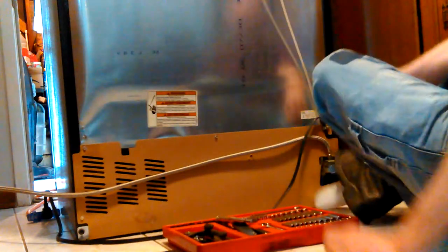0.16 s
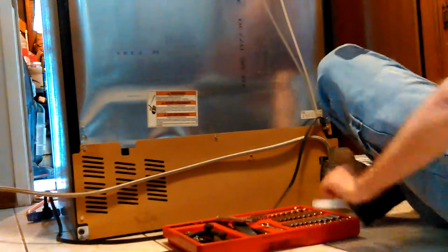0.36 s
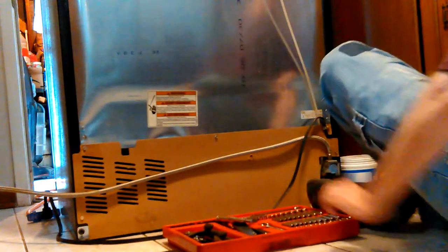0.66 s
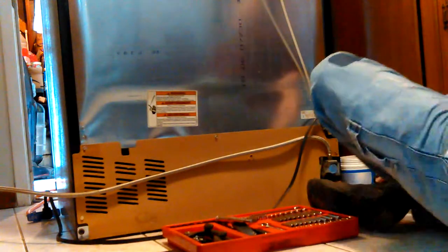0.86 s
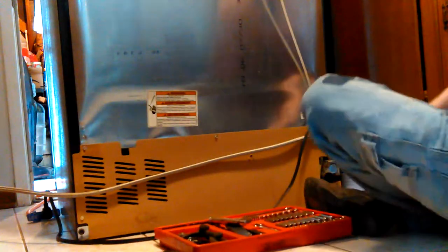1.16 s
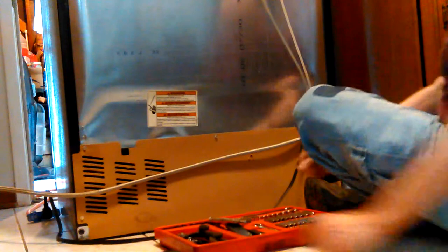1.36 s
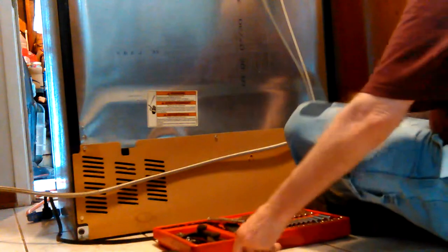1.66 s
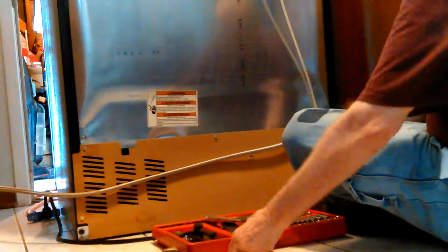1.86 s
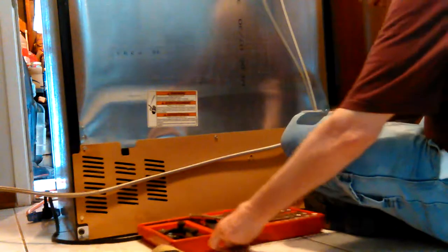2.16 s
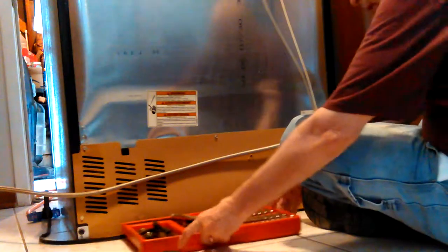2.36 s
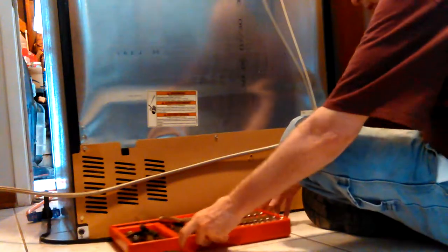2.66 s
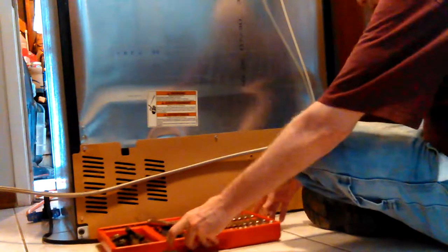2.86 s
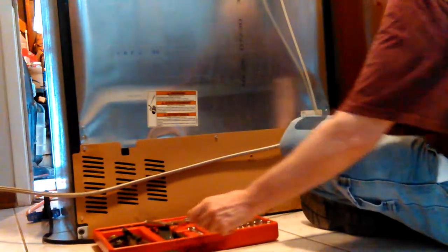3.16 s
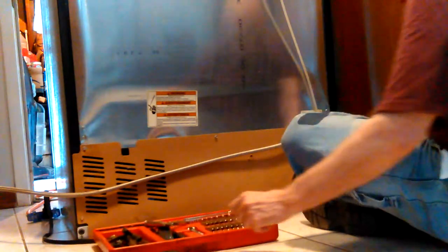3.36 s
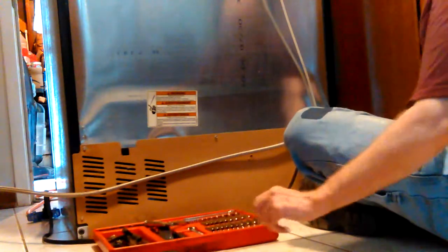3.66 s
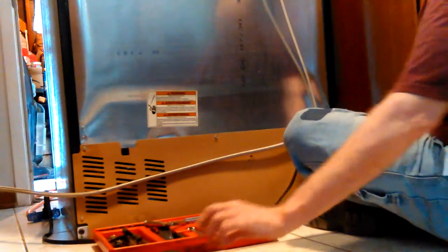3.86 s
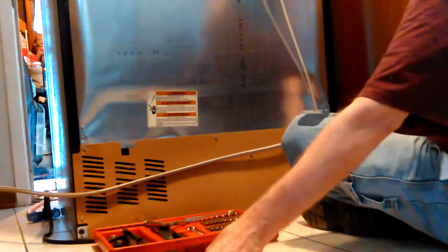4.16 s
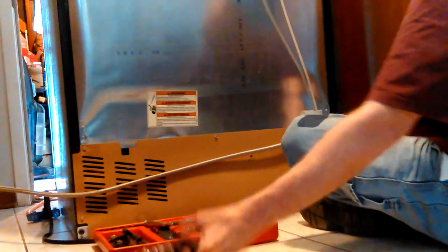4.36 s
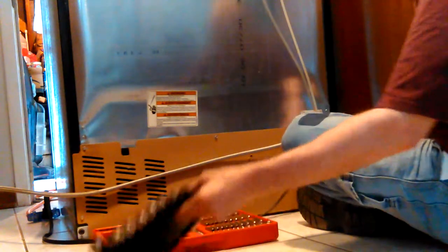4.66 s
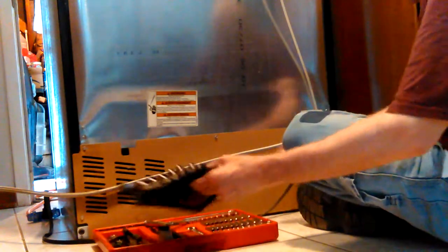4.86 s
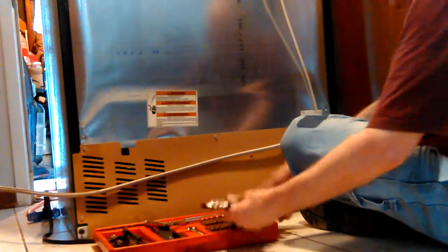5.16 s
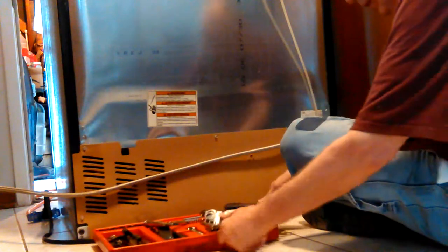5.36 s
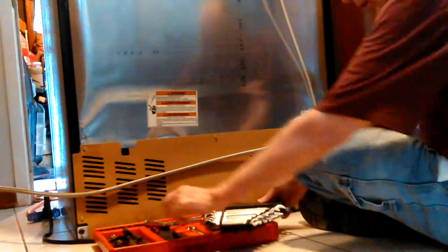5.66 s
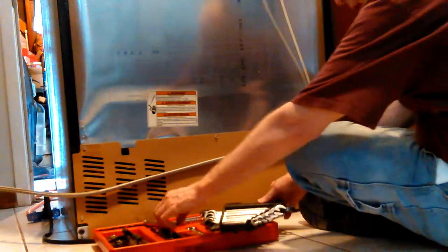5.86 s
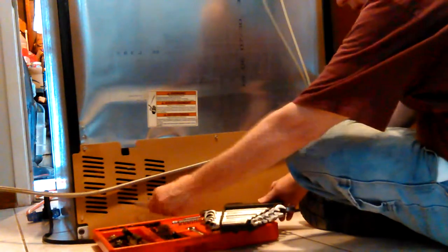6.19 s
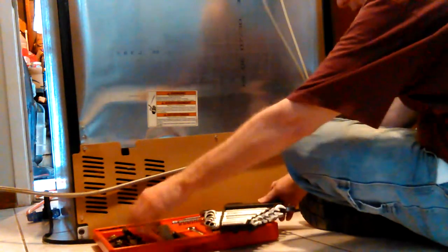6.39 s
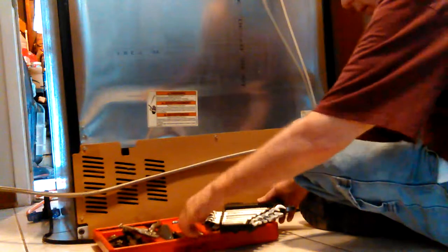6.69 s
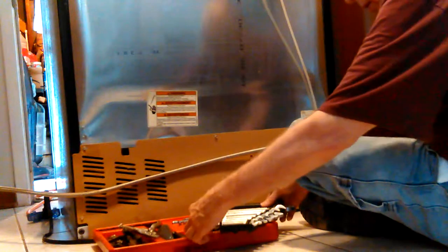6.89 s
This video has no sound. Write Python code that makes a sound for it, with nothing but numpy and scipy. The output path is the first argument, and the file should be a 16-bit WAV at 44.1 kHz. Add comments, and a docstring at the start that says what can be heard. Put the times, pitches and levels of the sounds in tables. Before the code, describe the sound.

Hollow bumps and rocking plastic taps, a plastic case scraping across tile, padded knocks, faint metal clinks, then a tool dropping and bouncing in a tray.

```python
"""A brush of cloth and hollow bumps over a low steady rumble: someone kneels on a tiled kitchen floor.
A small hard object rocks and taps, a plastic socket case is dragged closer, a pouch of wrenches is laid
on it, fingers pick among the sockets, and a tool drops back into the tray and bounces.
Blows are impulse responses of damped modes; sliding and brushing are random slips through a body.
The hard room answers them with dense echoes; shaped noise makes the rumble and a faint hiss."""
import sys
import numpy as np
from scipy import signal
from scipy.fft import rfft, irfft, next_fast_len
from scipy.io import wavfile
from scipy.ndimage import uniform_filter1d, map_coordinates

SR = 44100
rng = np.random.default_rng(int(sys.argv[2]) if len(sys.argv) > 2 else 0)


def output_pcm(signal):
    """Save a mono or channel-first signal as 16-bit PCM at the path in sys.argv[1].

    Samples are clipped to [-1, 1] before scaling.
    """
    pcm = np.clip(np.atleast_2d(signal).T, -1, 1) * 32767
    wavfile.write(sys.argv[1], SR, np.round(pcm).astype(np.int16))


N = 310023
HZ = np.fft.rfftfreq(16384, 1 / SR)  # frequency grid of the bodies
T = np.arange(SR * 3 // 4) / SR  # time within one blow [s]

# Levels of blows are those before the balance of the registers is applied.
# Hollow bumps as the body shifts: (time [s], level [dB], hardness [dB])
BUMPS = [(0.099, -31, -5), (0.126, -33.5, 7), (0.32, -39.5, -8)]
# Blows of a light plastic object: (time [s], level [dB], hardness [dB], time for light touches before [s])
ROCKS = [(0.273, -33, 3, 0.010), (0.412, -38, 0.5, 0.022), (0.529, -39.5, -1, 0.017),
         (0.607, -42.5, -3, 0.0018), (0.645, -53.5, 4, 0.00047), (3.45, -58, -24, 0.0046),
         (3.705, -63.5, -2.5, 0.000027)]
# Dull knocks of hand and padded wrenches: (time [s], level [dB], weight [dB])
KNOCKS = [(0.668, -40.5, 8.5), (0.943, -40, -1.5), (3.556, -51, 9), (3.705, -53, 5.5), (4.466, -40.5, 7.5),
          (4.598, -35.5, 3), (5.236, -25, -1), (5.32, -29.5, -9), (5.365, -23.5, -15), (5.435, -31, 4.5),
          (5.484, -34.5, 11), (5.502, -34, 8.5), (5.933, -44.5, 6.5), (6.131, -27.5, -2)]
# Socket against socket: (time [s], level [dB], hardness [dB])
CLINKS = [(5.951, -39, 0.5), (5.964, -38, -1), (6.1, -44, -1), (6.113, -50, 7), (6.123, -38, -4),
          (6.346, -58.5, 1)]
# Jolted sockets ring: (time [s], relative level [dB])
JINGLES = [(6.5844, -26), (6.5949, -44), (6.6382, -32.5)]
# Grit cracks under the case: (time [s], relative level [dB])
SNAGS = [(1.9576, -29), (2.5694, -28.5), (2.7543, -25.5), (2.8249, -22.5)]
# Pulls on the case, one list each: (time [s], effort [dB], treble re effort [dB])
PULLS = [
    [(1.88, -61, -4.5), (1.974, -52.5, -4.5), (2.084, -45.5, -5.5), (2.094, -44.5, -8.5), (2.18, -47, -5),
     (2.428, -41, -8), (2.56, -65, 5)],
    [(2.56, -56, -6), (2.568, -52, -3.5), (2.712, -45, -6), (2.816, -50, -2), (2.83, -46, -2),
     (3.008, -52.5, -7.5), (3.034, -63.5, -17), (3.1, -71.5, -11)],
]
# Cloth and skin on the floor: (time of peak [s], relative peak level [dB], rise [s], fall [s])
BRUSHES = [(0.04, -57, 0.19, 0.072), (0.945, -61, 0.04, 0.11), (1.008, -52, 0.031, 0.38),
           (1.78, -54, 0.25, 0.12), (3.458, -57, 0.042, 0.15), (3.55, -58, 0.05, 0.054),
           (3.712, -61.5, 0.008, 0.029), (4.11, -73, 0.06, 0.17), (4.472, -55.5, 0.02, 0.052),
           (4.601, -53, 0.034, 0.033)]

# Broad colour of each body, a blur of many modes: (frequency [Hz], relative level [dB])
HOLLOW_COLOUR = [(47, -63), (80, -24), (263, -24), (312, 2), (413, -22), (774, -24), (1090, -27),
                 (1800, -17), (6290, -21), (14000, -46)]
PLASTIC_COLOUR = [(59, -51), (100, -19), (318, -5.5), (425, -28.5), (481, -10), (791, -24), (1010, -15),
                  (1300, -4), (1960, 3), (2570, -7), (2970, 9.5), (3290, -8), (6380, -7.5), (14000, -39)]
POUCH_COLOUR = [(47, -50), (80, 2), (167, 6.5), (293, -1.5), (319, -16), (441, -1), (481, -0.5), (725, 3.5),
                (1020, 13.5), (1120, 9.5), (1300, 4.5), (2180, -35.5), (7010, -24.5), (14000, -43)]
SOCKET_COLOUR = [(88, -1), (150, -4), (237, 1), (460, -14.5), (812, -7.5), (1440, -15), (1800, -31),
                 (4230, -28.5), (7630, -21), (14000, -34)]
TRAY_COLOUR = [(35, -38), (60, -24), (84, -10), (146, -11), (258, 4), (325, 0), (408, -11), (512, -13),
               (738, -9), (866, -0.5), (1430, -11.5), (3110, -9.5), (7740, -14), (14000, -29)]
# Colour of the case's base and walls, the grit and the cloth: (frequency [Hz], relative level [dB])
BASE_COLOUR = [(41, -29), (70, -16), (124, 7.5), (210, -5), (241, -6), (343, -8.5), (450, -14.5),
               (580, -46), (990, -120)]
WALL_COLOUR = [(260, -20), (450, -5), (490, 4), (658, 2.5), (834, 6.5), (1100, 2), (1570, 1.5),
               (2500, -10.5), (3250, -37), (5500, -120)]
GRIT_COLOUR = [(1060, -11), (1800, -5), (1980, -4), (2660, -5), (4750, -4.5), (6550, -6), (7660, -10.5),
               (8720, -15.5), (13600, -22), (14300, -29)]
DENIM_COLOUR = [(120, -43.5), (200, -8.5), (252, 5), (347, -20), (522, -10.5), (694, -12.5), (922, -7.5),
                (1040, -9.5), (1250, -9.5), (1540, -11.5), (4180, -15), (6180, -15.5), (14000, -37.5)]
# Resonances that stand out of each body: (frequency [Hz], width [Hz], relative level [dB])
HOLLOW_MODES = [(202, 15, -13.5), (319.3, 8.5, -5), (646, 15, -15.5), (860, 38, -11.5), (1055, 42, -13),
                (1125, 33, -8.5), (1566, 51, -23.5)]
PLASTIC_MODES = [(1013, 86, -4), (1645, 180, -12), (2120, 79, 2.5), (2454, 110, -3), (2720, 64, 1),
                 (2910, 66, 10), (3430, 105, 1.5), (4040, 72, -2), (4880, 140, -11), (5670, 180, -12),
                 (6450, 110, -14)]
POUCH_MODES = [(330.7, 30, 5), (616, 58, 1), (770, 76, 8.5), (819, 28, 7), (860, 17, 13.5), (990, 110, 3),
               (1226, 14, 8), (1395, 27, 2), (1514, 13, -3), (1980, 23, -28)]
SOCKET_MODES = [(4300, 74, -21), (6430, 220, -1), (7150, 170, -1), (7560, 69, -1), (8000, 86, 0),
                (9820, 70, 2.5), (10950, 110, -3)]
TRAY_MODES = [(85, 10, -4), (194, 21, 0), (242, 23, -6), (271, 9, -3), (316, 9, -1), (537, 51, 0.5),
              (730, 40, 4.5), (885, 15, -9), (942, 12, -4), (1016, 17, 6.5), (1145, 160, 0), (1410, 74, 1),
              (1440, 31, -1), (1592, 37, -3), (2042, 20, 1.5)]
STEEL_MODES = [(5720, 670, -4), (6300, 130, 1.5), (6900, 300, -15), (8150, 350, -4.5), (8900, 350, -17),
               (11800, 900, -16)]
BASE_MODES = [(89.8, 3.8, 2), (121, 8.8, -3), (189, 18, -3.5), (241, 12, -3), (274, 13, -5)]
WALL_MODES = [(488, 43, -3), (674, 71, -3), (850, 80, 1), (870, 33, 10), (1170, 70, 4), (1490, 140, 4),
              (2070, 54, -1)]

# Spectrum of the steady rumble: (frequency [Hz], relative level [dB])
AMBIENCE_COLOUR = [(12, -33), (20, 3.5), (38, -3.5), (62, -3.5), (82, 3.5), (105, -4), (162, -2),
                   (201, -15), (244, -11.5), (280, -20.5), (797, -22.5), (1050, -20.5), (1140, -21.5),
                   (1240, -23.5), (2330, -32.5), (7810, -44), (10300, -44), (14300, -44.5)]
# Bands of the microphone hiss: (frequency [Hz], width [Hz], relative level [dB])
HISS_BANDS = [(6000, 1900, -1), (10460, 610, 2)]
# Decay of the kitchen's tail: (frequency [Hz], fall by 60 dB [s])
ROOM_DECAY = [(100, 0.11), (500, 0.38), (2000, 0.44), (6000, 0.44), (13000, 0.21)]
# Stereo difference: (frequency [Hz], side re mid [dB])
WIDTH = [(3000, -90), (4500, -27), (6500, -9), (9000, -5.5), (12000, -5.5), (14000, -7)]

# Balance of the registers of a blow: bass, middle, presence, treble [dB]
HOLLOW_DB = (-9, -7.5, -16.5, -26.5)
PLASTIC_DB = (-15, -5, 2, -3.5)
POUCH_DB = (-16.5, -10, -15, -40.5)
SOCKET_DB = (-17, -14, -15.5, -15)
TRAY_DB = (-6.5, -7, -11, -15.5)
HARDNESS = (-0.071, -0.1, 0.1, 1)  # dB each register gains per dB of hardness
WEIGHT = (0.85, 0.25, 0.25, 0.37)  # the same per dB of weight behind the blow

# Rocking: time between contacts [s], first light touch [dB], gain per touch [dB], rebound re its blow [dB]
CHATTER_S, CHATTER_DB, CHATTER_GROWS_DB = 0.0103, -41.5, 2.5
REBOUND_DB, REBOUND_HARDNESS_DB = -2.5, -10
# Dropped tool: landing time [s] and level [dB]; delay [s] and hardness [dB] of the second end
DROP_S, DROP_DB, SLAP_S, SLAP_HARDNESS_DB = 6.464, -22, 0.010, 3
FLIGHT_S, SHRINK = 0.119, 0.52  # first flight [s]; each flight over the one before
LOSS_DB, LOSS_GROWS = 7.5, 1.4  # loss at the first bounce [dB]; it grows as this power of the count
BOUNCE_HARDNESS_DB = -1.5  # a bounce re the landing
# Dragging: effort and treble of a steady pull, the level of each part there [dB], dB gained per dB of effort
EFFORT_DB, TREBLE_DB = -45, -6.5
RUMBLE_DB, JUDDER_DB, GRIT_DB = -48.5, -49.5, -49.5
RUMBLE_GROWS, JUDDER_GROWS, GRIT_GROWS = 1.24, 1.01, 1.1
# Brushing: drop over one rise or fall time [dB]; roundness of the swell
BRUSH_DEPTH_DB, BRUSH_ROUND = 19.5, 2.03
AMBIENCE_DB, HISS_DB = -57.5, -82.0
TOP_HZ = 14350  # band limit


def body_bumps():
    """Impact on a hollow body: low modes ring as the person shifts."""
    def hollow():
        return body(HOLLOW_COLOUR, HOLLOW_MODES, ring_db=11.0)
    return strikes(BUMPS, hollow, contact_t60=0.016, balance_db=HOLLOW_DB, touch=HARDNESS)


def rocking_contacts():
    """Repeated impact: one or two light touches precede the first three blows; every blow has one rebound."""
    contacts = []
    for s, db, hardness_db, run_up in ROCKS:
        for k in range(round(run_up / CHATTER_S)):  # none where the time is too short
            contacts.append((s - run_up + k * CHATTER_S, CHATTER_DB + k * CHATTER_GROWS_DB, 0))
        contacts.append((s, db, hardness_db))
        contacts.append((s + CHATTER_S, db + REBOUND_DB, hardness_db + REBOUND_HARDNESS_DB))
    return contacts


def rocking_plastic():
    """Impact of a light shell: mode pitches vary a little from contact to contact."""
    def shell():
        return body(PLASTIC_COLOUR, PLASTIC_MODES, ring_db=13.0, detune=0.035)
    return strikes(rocking_contacts(), shell, contact_t60=0.016, balance_db=PLASTIC_DB, touch=HARDNESS)


def wrench_pouch():
    """Damped impact: padding lengthens the contact and leaves little treble."""
    def pouch():
        return body(POUCH_COLOUR, POUCH_MODES, ring_db=-2.0, detune=0.032)
    return strikes(KNOCKS, pouch, contact_t60=0.047, balance_db=POUCH_DB, touch=WEIGHT)


def socket_clinks():
    """Impact of steel on steel: high modes, at pitches that vary from clink to clink."""
    def socket():
        return body(SOCKET_COLOUR, SOCKET_MODES, ring_db=-10, detune=0.04)
    return strikes(CLINKS, socket, contact_t60=0.024, balance_db=SOCKET_DB, touch=HARDNESS)


def bouncing_contacts(count=3):
    """Energy loss at impact: one end lands, then the other, and the flights shorten."""
    contacts = [(DROP_S, DROP_DB, 0), (DROP_S + SLAP_S, DROP_DB, SLAP_HARDNESS_DB)]
    s = DROP_S
    for k in range(1, count + 1):
        s += FLIGHT_S * SHRINK ** (k - 1)
        contacts.append((s, DROP_DB - LOSS_DB * k ** LOSS_GROWS, BOUNCE_HARDNESS_DB))
    return contacts


def dropped_tool():
    """Impulsive excitation of a tray: each landing of the tool makes the plastic boom."""
    def tray():
        return body(TRAY_COLOUR, TRAY_MODES, ring_db=-3.5)
    return strikes(bouncing_contacts(), tray, contact_t60=0.02, balance_db=TRAY_DB, touch=HARDNESS)


def jolted_sockets():
    """Free vibration of steel: the jolted sockets ring in their high modes alone."""
    def steel():
        return causal(resonances(STEEL_MODES, detune=0.011))
    return ticks(JINGLES, steel, contact_t60=0.022, level_db=-14.5)


def sliding_case():
    """Stick-slip friction: base rumbles, walls judder and grit hisses with effort; grit also cracks."""
    rumble = judder = grit = 0
    for pull in PULLS:
        effort, treble = gains(pull)
        effort = effort / amp(EFFORT_DB)
        treble = np.where(effort > 0, treble / amp(TREBLE_DB), 1)
        rumble += amp(RUMBLE_DB) * effort ** RUMBLE_GROWS
        # the case either bites and judders or runs freely on the grit
        judder += amp(JUDDER_DB) * effort ** JUDDER_GROWS / treble
        grit += amp(GRIT_DB) * effort ** GRIT_GROWS * treble
    grip = unit(amp(1.6 * wobble(60)))  # the case sticks and slips
    sand = causal(amp(along(GRIT_COLOUR, HZ)))
    base_body = body(BASE_COLOUR, BASE_MODES, ring_db=2.5)
    wall_body = body(WALL_COLOUR, WALL_MODES, ring_db=-9)
    base = rubbing(rumble * grip, base_body, slips=350, spread_db=2.0)
    walls = rubbing(judder * grip, wall_body, slips=390, spread_db=3.0)
    hiss = rubbing(grit * grip, sand, slips=1000, spread_db=3.0)
    cracks = ticks(SNAGS, lambda: sand, contact_t60=0.018, level_db=-26.5)
    return base + walls + hiss + cracks


def denim():
    """Fibre friction: trouser legs and hands brush the floor, every stroke swelling and dying away."""
    t = np.arange(N) / SR
    pressure = 0
    for s, db, rise, fall in BRUSHES:
        away = np.maximum((s - t) / rise, (t - s) / fall)
        pressure += amp(db - BRUSH_DEPTH_DB * np.abs(away) ** BRUSH_ROUND)
    cloth = causal(amp(along(DENIM_COLOUR, HZ)))
    return rubbing(amp(-2.5) * pressure, cloth, slips=3000, spread_db=3.0)


def ambience():
    """Stationary filtered noise: the steady low rumble and the faint hiss of the microphone."""
    rumble = unit(filtered(rng.standard_normal(N), lambda hz: amp(along(AMBIENCE_COLOUR, hz))))
    hiss_response = causal(resonances(HISS_BANDS, scatter_db=0))
    hiss = unit(signal.fftconvolve(rng.standard_normal(N), hiss_response)[:N])
    return amp(AMBIENCE_DB) * rumble + amp(HISS_DB) * hiss


def strikes(rows, new_body, contact_t60, balance_db, touch):
    """Contact mechanics: the hardness or weight of each blow shifts the balance of the registers."""
    track = np.zeros(N)
    edges = [(600, "low"), ([600, 1800], "band"), ([1800, 4500], "band"), (4500, "high")]
    registers = [signal.butter(3, edge, kind, fs=SR, output="sos") for edge, kind in edges]
    for s, db, touch_db in rows:
        sound = blow(new_body(), contact_t60)
        levels = amp(db + np.array(balance_db) + touch_db * np.array(touch))
        for level, band in zip(levels, registers):
            add(track, s, level * onset_unit(signal.sosfilt(band, sound)))
    return track


def ticks(rows, new_body, contact_t60, level_db):
    """Small impacts of like colour, each at its own level."""
    track = np.zeros(N)
    for s, db in rows:
        add(track, s, amp(db + level_db) * onset_unit(blow(new_body(), contact_t60)))
    return track


def blow(response, contact_t60):
    """Linear convolution: one contact, rung through a body and the room."""
    return signal.fftconvolve(response, room(contact_t60))[:len(T)]


def rubbing(gain, response, slips, spread_db):
    """Friction as random impulses: uneven slips, so many a second, excite a body; the echoes change."""
    happens = rng.random(N) < slips / SR
    force = happens * rng.standard_normal(N) * amp(spread_db * rng.standard_normal(N))
    close = gain * unit(signal.fftconvolve(force, response)[:N])
    track = np.zeros(N)
    step = SR // 6  # a new path through the room for each stretch
    for start in range(0, N, step):
        stretch = close[start:start + step]
        if stretch.any():
            add(track, start / SR, signal.fftconvolve(stretch, room()))
    return track


def body(colour, modes, ring_db, detune=0):
    """Modal density: many damped modes blur into a colour, a few stand out."""
    blur = unit(amp(along(colour, HZ)))
    ring = amp(ring_db) * resonances(modes, detune=detune)
    return causal(np.hypot(blur, ring))


def resonances(modes, scatter_db=2, detune=0):
    """Modal excitation: gain of resonant peaks, with random variation of level and pitch at each call."""
    chance = rng.standard_normal((len(modes), 2))
    power = 0
    for (hz, width, db), (size, shift) in zip(modes, chance):
        centre = hz * np.exp(detune * shift)
        peak = 1 / (1 + ((HZ ** 2 - centre ** 2) / (width * HZ + 1e-9)) ** 2)
        skirt = np.exp(-np.log2((HZ + 1) / centre) ** 2)  # far from their pitch the modes cancel one another
        power = power + amp(db + scatter_db * size) ** 2 * peak * skirt
    return unit(np.sqrt(power))


def causal(gain):
    """Minimum phase: the impulse response of this gain's shape that rings only after the blow."""
    cepstrum = irfft(np.log(np.maximum(gain / gain.max(), 1e-6)))
    half = len(cepstrum) // 2
    folded = np.r_[cepstrum[0], 2 * cepstrum[1:half], np.zeros(half)]
    return irfft(np.exp(rfft(folded)))[:half]


def room(contact_t60=0.012, direct_db=-5, late_db=-7, early_t60=0.19, build=0.0026):
    """Reverberation: brief contact, dense echoes off floor and appliance, then the kitchen's tail."""
    direct = unit(rng.standard_normal(len(T)) * fade(T, contact_t60))
    early = unit(rng.standard_normal(len(T)) * fade(T, early_t60) * (1 - np.exp(-T / build)))
    hz, t, z = signal.stft(rng.standard_normal(len(T)), SR, nperseg=256)
    decaying = z * fade(t, along(ROOM_DECAY, hz)[:, None])
    late = unit(signal.istft(decaying, SR, nperseg=256)[1][:len(T)])
    path = amp(direct_db) * direct + early + amp(late_db) * late
    # the path spreads a sound in time but leaves its broad colour alone
    power = uniform_filter1d(np.abs(rfft(path, 2 * len(HZ) - 2)) ** 2, size=48)
    path = signal.fftconvolve(path, causal(1 / np.sqrt(power)))[:len(T)]
    return path / np.linalg.norm(path)


def amp(db):
    """Level law: decibels to gain."""
    return 10 ** (np.asarray(db) / 20)


def unit(x):
    """Mean power: scaled to rms 1."""
    return x / np.sqrt(np.mean(x ** 2) + 1e-30)


def onset_unit(x):
    """Onset power: scaled to rms 1 over the first 25 ms."""
    return x / np.sqrt(np.mean(x[:SR // 40] ** 2) + 1e-30)


def along(points, hz):
    """Logarithmic pitch scale: interpolates (frequency [Hz], value) points on it."""
    f, v = np.transpose(points)
    return np.interp(np.log(hz + 1), np.log(f + 1), v)


def fade(t, t60):
    """Exponential decay: falls 60 dB in t60."""
    return np.exp(-np.log(1000) * t / t60)


def gains(rows):
    """Level envelopes: one gain per sample for each dB column, silent outside the rows."""
    s, *cols = np.transpose(rows)
    t = np.arange(N) / SR
    return [amp(np.interp(t, s, c, left=-np.inf, right=-np.inf)) for c in cols]


def wobble(rate):
    """Random fluctuation: a smooth curve with rate knots a second."""
    knots = rng.standard_normal(int(N * rate / SR) + 4)
    return map_coordinates(knots, [np.arange(N) * rate / SR])


def filtered(x, response):
    """Linear filtering: the spectrum of x times a function of frequency."""
    n = x.shape[-1]
    m = next_fast_len(n + SR // 4)
    return irfft(rfft(x, m) * response(np.fft.rfftfreq(m, 1 / SR)), m)[..., :n]


def add(track, s, sound):
    """Superposition: mixes a sound in at time s [s]."""
    part = track[round(s * SR):][:len(sound)]
    part += sound[:len(part)]


def scene():
    """Decorrelation: all is central below about 3 kHz; the treble is spread to the sides."""
    handling = body_bumps() + rocking_plastic() + wrench_pouch()
    tools = socket_clinks() + dropped_tool() + jolted_sockets()
    mid = handling + tools + sliding_case() + denim() + ambience()
    scatter = rng.standard_normal(len(T)) * fade(T, .12)
    scattered = signal.fftconvolve(mid, scatter / np.linalg.norm(scatter))[:N]
    side = filtered(scattered, lambda hz: amp(along(WIDTH, hz)))
    return np.array([mid + side, mid - side])


def record(dry):
    """Band limitation: a very steep low-pass removes the highest treble."""
    return filtered(dry, lambda hz: 1 / np.sqrt(1 + (hz / TOP_HZ) ** 200))


dry = scene()
out = record(dry)
output_pcm(out)
```